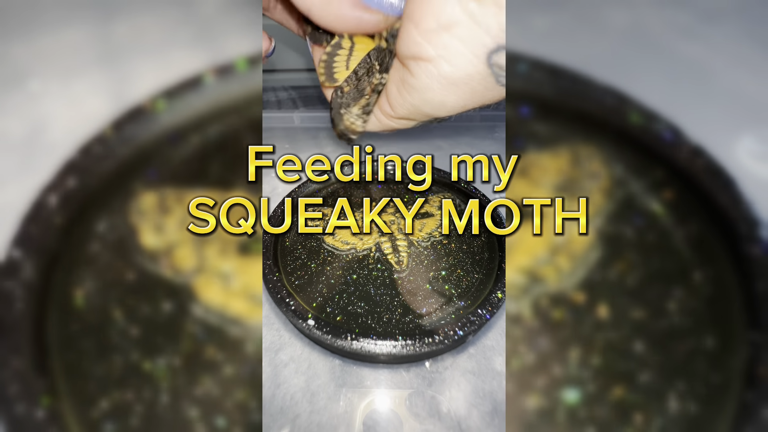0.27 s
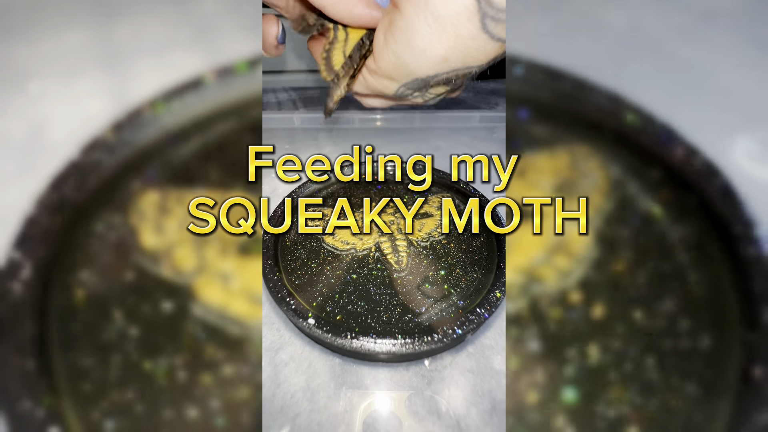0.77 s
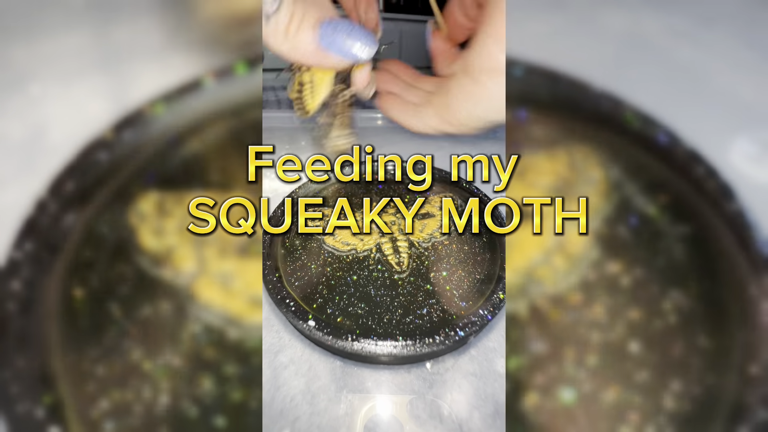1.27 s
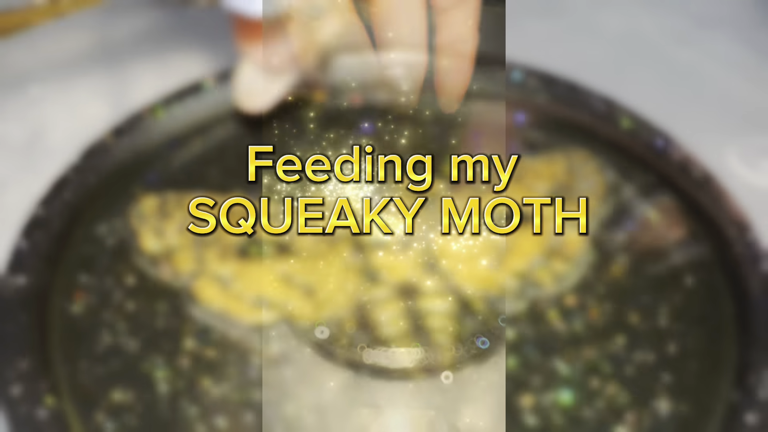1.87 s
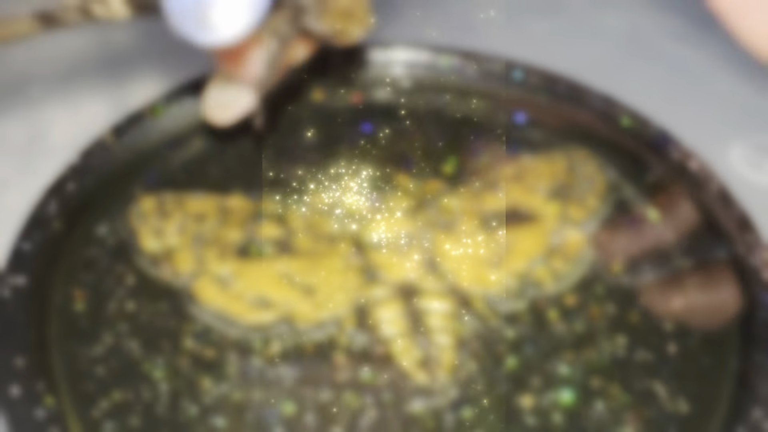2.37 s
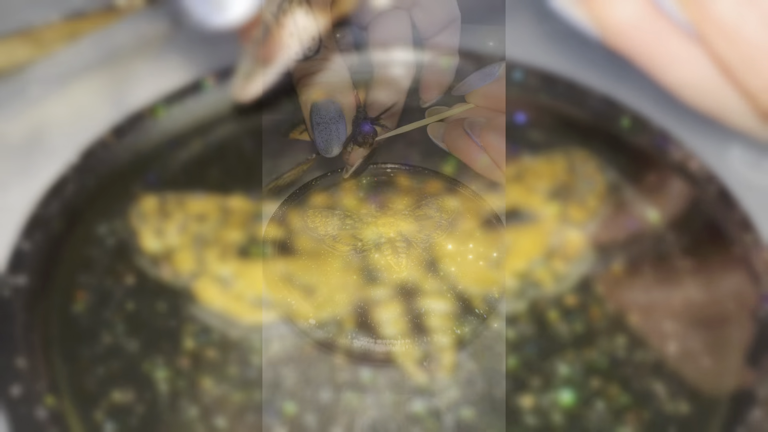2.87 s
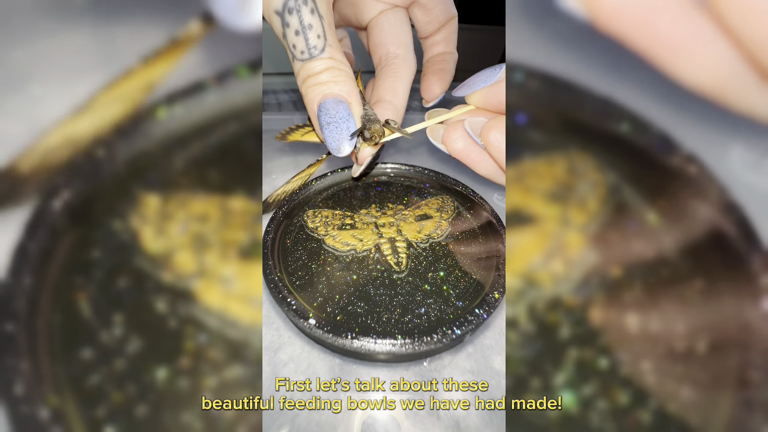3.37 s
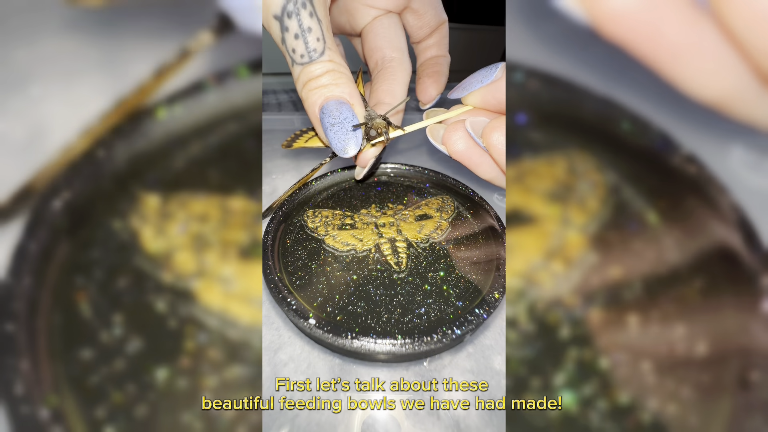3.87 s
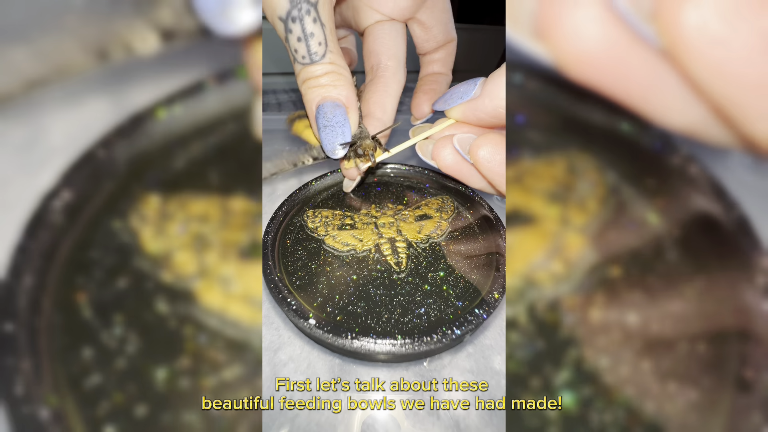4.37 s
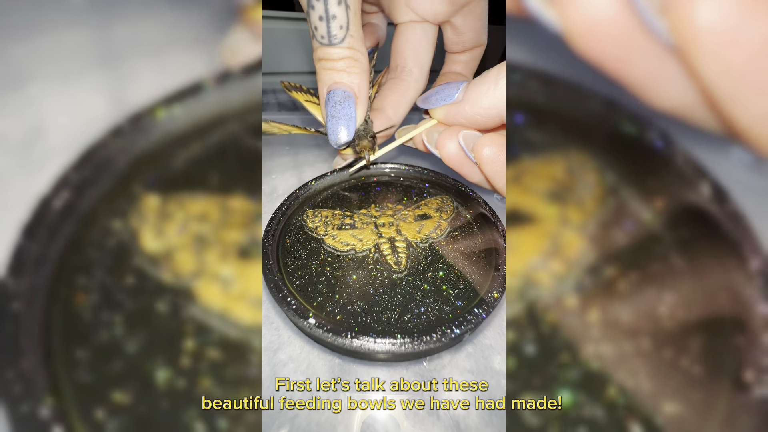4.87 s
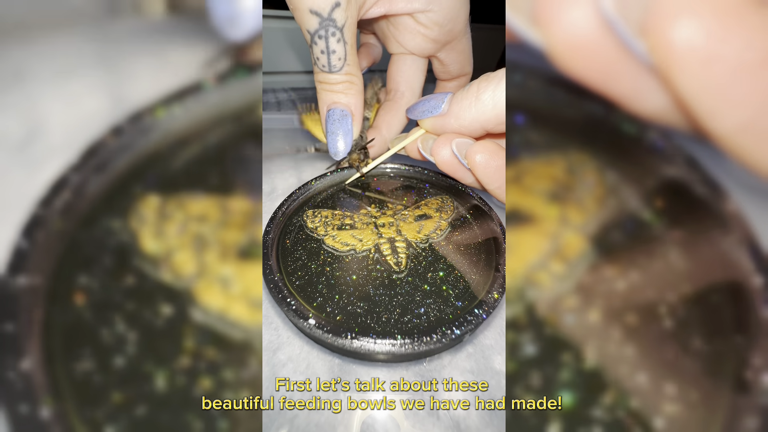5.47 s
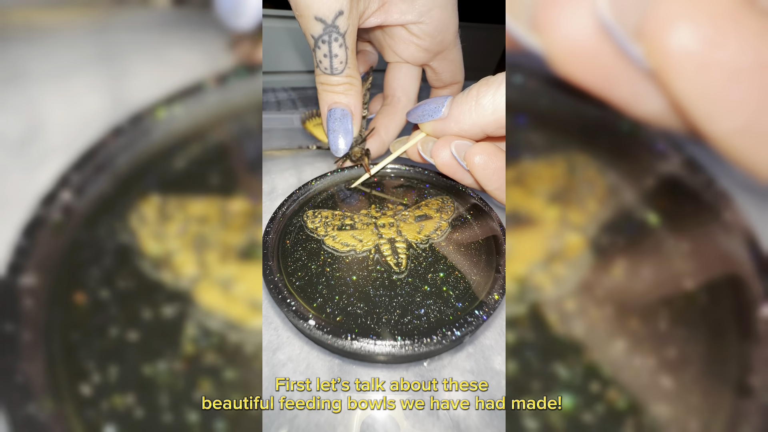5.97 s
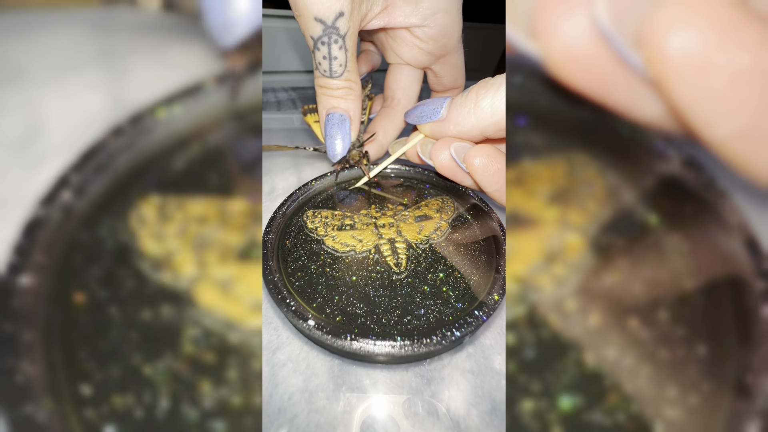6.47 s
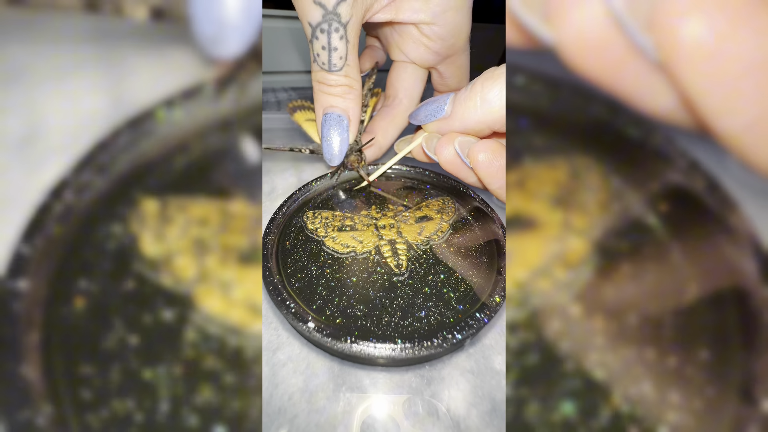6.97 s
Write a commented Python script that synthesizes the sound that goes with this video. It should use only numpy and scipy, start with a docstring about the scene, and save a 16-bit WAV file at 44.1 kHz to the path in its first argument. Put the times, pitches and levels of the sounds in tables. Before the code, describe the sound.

A large moth squeaks close to a phone microphone in a small quiet room. Short, buzzy, high chirps come regularly at first, grow louder and sharper after one second, then break into uneven clicks and short squeaks. Later the chirps turn slower, softer and more rattling. Tiny airy whistles follow some squeaks. Fingers and a stick softly bump the table over faint rumble, hum, rustle and hiss.

```python
"""A hawkmoth squeaks as it pumps air through its proboscis, held close to a phone in a small room.
Each intake flaps a lip in its throat into a train of sharp pulses, or into a few weak clicks.
Air blown back out gives a short, fluttering whistle.
Fingers and a feeding stick bump the table now and then, as a dull thud with a short tap of noise.
Underneath lie room rumble, a faint mains hum, rustling hands, hiss and one low, swelling drone."""
import sys
import numpy as np
from scipy import signal
from scipy.fft import rfft, irfft, next_fast_len
from scipy.io import wavfile
from scipy.ndimage import map_coordinates

SR = 44100
rng = np.random.default_rng(int(sys.argv[2]) if len(sys.argv) > 2 else 0)


def transcribe(u):
    """Save the signal u as a 16-bit wav file named by the first command-line argument.

    u: samples, shape (n,) or (channels, n), limited to [-1, 1]; the rate is SR.
    q: integer samples, one column per channel.
    """
    v = np.clip(np.atleast_2d(u).T, -1, 1)
    q = np.round(v * 32767).astype(np.int16)
    wavfile.write(sys.argv[1], SR, q)


N = 317961


def amp(db):
    """Amplitude ratio of a level in dB."""
    return 10 ** (np.asarray(db) / 20)


def unit(x):
    """Scale x to rms 1."""
    return x / np.sqrt(np.mean(x ** 2) + 1e-20)


def along(points, hz):
    """Read (f/Hz, value) points on a log frequency axis."""
    f, value = np.transpose(points)
    return np.interp(np.log(hz + 1), np.log(f + 1), value)


def curves(rows):
    """One value per sample for each column after the time."""
    s, *columns = np.transpose(rows)
    return [np.interp(np.arange(N) / SR, s, c) for c in columns]


def add(track, s, x):
    """Mix x into the track from time s."""
    i = max(0, round(s * SR))
    part = track[..., i:i + x.shape[-1]]
    part += x[..., :part.shape[-1]]


def wobble(rate, size):
    """A smooth random curve, rate knots a second."""
    knots = rng.standard_normal(int(size * rate / SR) + 4)
    return map_coordinates(knots, [np.arange(size) * rate / SR])


def filtered(x, response):
    """x times a complex response of frequency."""
    m = next_fast_len(x.shape[-1] + SR // 10)
    spectrum = rfft(x, m) * response(np.fft.rfftfreq(m, 1 / SR))
    return irfft(spectrum, m)[..., :x.shape[-1]]


def noise(colour, side_db, size):
    """Coloured stereo noise: a middle of about rms 1 and an independent side at side_db."""
    white = rng.standard_normal((2, size))
    mid, side = unit(filtered(white, lambda hz: amp(along(colour, hz))))
    return np.array([mid + amp(side_db) * side, mid - amp(side_db) * side])


# a low drone that sinks and swells from start to end; its start level is in dB
DRONE_START_S, DRONE_END_S = 2.62, 3.29
DRONE_HZ, DRONE_SAG_HZ_PER_S = 87.7, 22
DRONE_DB, DRONE_SWELL_DB_PER_S = -71, 30


def drone(overtone_db=-23, fade_s=0.012):
    """A faint, unsteady low tone with two overtones swells, sinks in pitch and stops."""
    out = np.zeros(N)
    t = np.arange(round((DRONE_END_S - DRONE_START_S) * SR)) / SR
    pitch = (DRONE_HZ - DRONE_SAG_HZ_PER_S * t) * (1 + 0.016 * wobble(18, len(t)))
    phase = 2 * np.pi * np.cumsum(pitch) / SR
    tone = unit(np.sin(phase) + amp(overtone_db) * (np.sin(2 * phase) + np.sin(3 * phase)))
    swell = amp(DRONE_DB + DRONE_SWELL_DB_PER_S * t)
    fade = np.clip(np.minimum(t, t[-1] - t) / fade_s, 0, 1)
    add(out, DRONE_START_S, tone * swell * fade)
    return out


# bed levels before their gains: (t/s, rumble level/dB, rustle level/dB)
BED_LEVELS = [(0.0, -68.5, -65.5), (0.68, -65.5, -78), (2.01, -64.5, -74), (2.45, -68, -75.5),
              (3.03, -62.5, -74), (3.78, -68, -82), (4.68, -64.5, -73), (5.48, -60.5, -77),
              (5.88, -70, -77.5), (6.36, -64.5, -79), (6.81, -62, -75.5), (7.21, -79, -87)]
# hiss before its random drift: (t/s, level/dB)
HISS_LEVELS = [(0, -67.5), (1.1, -67.5), (1.8, -79), (7.2, -77)]
# colour of the room rumble: (f/Hz, level/dB)
RUMBLE_COLOUR = [(13, -58), (22, -22.5), (43, 6.5), (86, 5.5), (200, -18), (260, -17.5), (440, -120)]
# colour of the rustling hands: (f/Hz, level/dB)
RUSTLE_COLOUR = [(90, -22), (150, 5), (300, -9.5), (600, -17.5), (1000, -18.5), (2000, -25), (4000, -34)]
# colour of the hiss: (f/Hz, level/dB)
HISS_COLOUR = [(600, -41), (1500, -8.5), (3000, -1), (4600, -7), (7600, 0), (12500, -34), (15300, -14.5),
               (17000, -28.5)]


def background(hum_hz=100, hum_max_db=-66, rumble_gain_db=2, rustle_gain_db=1):
    """Noise shaped into rumble, hand rustle and hiss, with a wavering sine for the mains hum."""
    t = np.arange(N) / SR
    rumble_db, rustle_db = curves(BED_LEVELS)
    fidget_db = 2 * wobble(13, N)  # rumble and rustle move together
    rumble = amp(rumble_db + rumble_gain_db + fidget_db) * noise(RUMBLE_COLOUR, -6.0, N)
    rustle = amp(rustle_db + rustle_gain_db + fidget_db) * noise(RUSTLE_COLOUR, 1, N)
    hiss = amp(curves(HISS_LEVELS)[0] + 1.3 * wobble(8, N)) * noise(HISS_COLOUR, -9.5, N)
    # hum_max_db caps the hum before its own drift
    hum_level = amp(np.minimum(hum_max_db, rumble_db - 1.5) + 3.8 * wobble(3.7, N))
    hum = hum_level * unit(np.sin(2 * np.pi * hum_hz * t + .5 * wobble(3.2, N)))
    balance = amp([[1], [-1]])  # left 1 dB up, right 1 dB down
    return (rumble + hum + drone()) * balance + rustle + hiss


# pulse colour while the moth is in the hand: (f/Hz, level/dB)
IN_HAND_COLOUR = [(250, -44), (600, -37.5), (1250, -25), (2100, -26), (3400, -19), (4600, -7.5), (5600, -9),
                  (6600, 4), (7700, 1.5), (8900, -8), (10300, -0.5), (12800, -30), (15200, -12),
                  (16600, -63)]
# pulse colour while it is pressed: (f/Hz, level/dB)
PRESSED_COLOUR = [(250, -40), (600, -44), (1250, -30), (2100, -35.5), (3400, -17), (4600, -9.5),
                  (5600, -17), (6600, -5), (7700, 4.5), (8900, -4), (10300, -9.5), (12800, -11.5),
                  (15200, -5), (16600, -40.5)]
# pulse colour while it is feeding: (f/Hz, level/dB)
FEEDING_COLOUR = [(250, -43.5), (600, -31), (1250, -18.5), (2100, -28), (3400, -13.5), (4600, -10),
                  (5600, -14), (6600, -6), (7700, 2.5), (8900, -7), (10300, -5.5), (12800, -16),
                  (15200, -11.5), (16600, -42)]
# courses of an intake, one entry per stage:
# ([flap rate over halfway rate], [strength level/dB], intake length for the full sweep/s)
ARCHED_COURSE = ([.86, .94, 1.03, 1, .78, 0.35], [-1, -1, -1.5, -2.5, -2, -7.5], .015)
FADING_COURSE = ([1, 1.08, 1.1, 0.92, 0.59, 0.35], [7, -0.5, -1.5, -1, 0.1, 0.5], 0.025)
GULPED_COURSE = ([1.25, 1.6, 1.17, 0.89, 0.83, 0.53], [-1.6, -2.6, 0.59, 0.95, 0.38, 0.16], 0.072)


def posture(s):
    """Colour, throat resonance at rest (Hz) and intake course for the way the moth is held at s."""
    held = [(1.22, IN_HAND_COLOUR, 7150, ARCHED_COURSE),  # until this time in s
            (4.05, PRESSED_COLOUR, 7760, FADING_COURSE),
            (8, FEEDING_COLOUR, 7760, GULPED_COURSE)]
    return next(rest for until, *rest in held if s < until)


def flaps(times, sizes, puff, ring=0.26, ring_s=0.00036, size=16):
    """Each flap is a snap and a tiny puff of air; the mouth cavity rings anew on each call."""
    at = times * SR + size // 2
    # windowless sinc snaps land between samples
    taps = at.astype(int)[:, None] + np.arange(1 - size // 2, size // 2 + 1)
    shapes = sizes[:, None] * np.sinc(taps - at[:, None])
    snaps = np.bincount(taps.ravel(), shapes.ravel(), taps.max() + SR // 200)
    starts = np.bincount(at.astype(int), sizes, len(snaps))
    t = np.arange(SR // 200) / SR
    decay = np.exp(-t / .0015)
    air = np.convolve(starts, decay / np.linalg.norm(decay))[:len(snaps)]
    cavity = rng.standard_normal(len(t)) * t * np.exp(-2 * t / ring_s)
    cavity = (t == 0) + ring * cavity / np.linalg.norm(cavity)
    return np.convolve(snaps + puff * air * rng.standard_normal(len(snaps)), cavity)


def ringing(colour_db, size=512):
    """The causal (minimum-phase) impulse response with a given colour, by folding its cepstrum."""
    cepstrum = irfft(colour_db(np.fft.rfftfreq(size, 1 / SR)) * np.log(10) / 20)
    cepstrum[1:size // 2] *= 2
    cepstrum[size // 2 + 1:] = 0
    return irfft(np.exp(rfft(cepstrum)))


# the throat tightens and relaxes:
# (t/s, resonance f/Hz, level near 4.5 kHz/dB, treble level/dB, extra level above 13 kHz/dB)
THROAT_TENSION = [(.3, 7170, 8, 7, 6), (.7, 6840, 1.5, 1.5, -3), (1.05, 6860, 0.5, 7, -5),
                  (1.26, 7430, -12, 3, -6), (1.6, 7340, 0.5, 1.5, -6), (2.05, 7790, 0, 5, -5.5),
                  (2.35, 7670, -3, -3, -3), (3.05, 8110, 0, -1.5, -6), (3.5, 8000, -1, 1.5, -3),
                  (3.9, 7980, -0.5, -0.5, 5), (4.6, 8200, 2, 3.5, 10.5), (5.099, 7520, 0.5, 4, 5),
                  (5.85, 7630, -1.5, 12, -4), (6.251, 7700, -1, 7, -6.5), (6.85, 7670, -3, 1, 8)]


def throat(x, s):
    """Pulses ring in the throat; posture sets the colour and tension shifts it a little."""
    colour, rest_hz, _ = posture(s)
    times, *columns = np.transpose(THROAT_TENSION)
    peak_hz, low_db, treble_db, sheen_db = [np.interp(s, times, c) for c in columns]
    tilt_hz = [2460, 4500, 5960, 8200, 9860, 12200, 13900]
    tilt_db = [0, low_db, 0, 0, treble_db, treble_db, treble_db + sheen_db]

    def colour_db(hz):
        # the shift fades out between 10 and 14 kHz
        moved = hz / (peak_hz / rest_hz) ** np.interp(hz, [10000, 14000], [1, 0])
        notch = np.interp(hz, [1600, 2150, 2900], [0, 2.5, 0])
        return along(colour, moved) + np.interp(hz, tilt_hz, tilt_db) - notch

    return np.convolve(x, ringing(colour_db))


# weak intakes of one to three flaps, level before the gain: (t/s, flaps, level/dB)
WEAK_INTAKES = [(.0446, 1, -47), (0.4683, 3, -37), (0.6699, 1, -39.5), (1.483, 2, -43), (1.7154, 1, -37),
                (2.1767, 1, -49), (2.264, 1, -28.5), (2.279, 2, -27.5), (2.977, 1, -41.5),
                (3.1327, 3, -34.5), (3.782, 2, -42), (4.0176, 1, -36.5), (4.1947, 1, -41.5),
                (4.2834, 1, -38), (4.4913, 1, -36.5), (4.7135, 1, -38.5), (4.82, 1, -47.5),
                (4.9126, 3, -46.5), (5.143, 1, -41), (5.1614, 1, -41), (5.51, 1, -43), (5.54, 1, -53),
                (5.9288, 1, -40), (6.095, 2, -35.5), (6.1268, 1, -39.5), (6.3036, 1, -35.5),
                (6.4663, 1, -41), (6.5857, 1, -41.5), (6.608, 1, -41), (6.6537, 1, -38), (6.7528, 2, -38.5)]


def clicks(gain_db=20, gap_s=0.0047):
    """Weak suction lets the lip flap only once or a few times, evenly spaced and equally loud."""
    out = np.zeros(N)
    for s, count, db in WEAK_INTAKES:
        for k in range(round(count)):
            click = throat(flaps(np.zeros(1), np.ones(1), puff=0.62), s)
            add(out, s + k * gap_s - .0003, amp(db + gain_db) * click / np.linalg.norm(click))
    return out


# full intakes: (start t/s, end t/s, halfway flap rate f/Hz before the course bends it, level/dB)
INTAKES = [(0.122, 0.145, 550, -35), (.21, .282, 640, -34.5), (0.373, 0.458, 730, -34.5),
           (0.571, 0.657, 740, -35.5), (0.725, .822, 705, -37.5), (0.905, 0.978, 720, -39.5),
           (1.046, 1.146, 620, -39), (1.24, 1.261, 570, -34.5), (1.266, 1.35, 620, -32),
           (1.519, 1.531, 400, -41.5), (1.546, 1.556, 360, -37), (1.561, 1.643, 624, -29),
           (1.923, 1.954, 368, -29.5), (1.9572, 1.975, 260, -28), (2.074, 2.107, 700, -28.5),
           (2.1956, 2.211, 490, -27.5), (2.251, 2.258, 430, -26.5), (2.302, 2.31, 390, -26.5),
           (2.3457, 2.405, 396, -27), (2.803, 2.834, 510, -29.5), (2.8688, 2.923, 530, -27.5),
           (3.0466, 3.06, 444, -37.5), (3.1755, 3.192, 486, -28.5), (3.4104, 3.426, 460, -31.5),
           (3.4337, 3.452, 550, -29.5), (3.4883, 3.508, 460, -26), (3.5334, 3.572, 457, -28),
           (3.703, 3.712, 640, -43), (3.7314, 3.742, 660, -38.5), (3.8317, 3.847, 730, -34),
           (3.889, 3.906, 630, -32), (3.946, 3.993, 650, -32.5), (4.129, 4.178, 515, -40),
           (4.207, 4.22, 270, -40.5), (4.2293, 4.276, 290, -39), (4.3809, 4.473, 307, -39),
           (4.5957, 4.618, 460, -38.5), (4.6252, 4.706, 320, -38.5), (4.9293, 4.987, 317, -41.5),
           (5.0364, 5.077, 312, -39.5), (5.107, 5.137, 234, -40), (5.278, 5.349, 376, -36.5),
           (5.6342, 5.656, 530, -37.5), (5.831, 5.912, 330, -34), (5.9958, 6.087, 354, -35.5),
           (6.1925, 6.274, 336, -36), (6.409, 6.416, 350, -52), (6.431, 6.441, 400, -48.5),
           (6.469, 6.493, 410, -37), (6.6136, 6.648, 287, -37), (6.8441, 6.901, 262, -37.5),
           (7.053, 7.062, 580, -45)]
# shares of an intake's length at which its course is given
COURSE_STAGES = [0, .1, .3, .5, .8, 1]


def squeaks(scatter_db=.6, puff=0.4, rise_s=.0025, slack=0.75):
    """The lip flaps fast and evenly under full suction and slows to uneven clicks as the intake ends."""
    out = np.zeros(N)
    for start, end, flap_hz, db in INTAKES:
        ratios, strength_db, full_s = posture(start)[2]
        t = np.arange(max(round((end - start) * SR), SR // 200)) / SR
        # short intakes sweep less
        sweep = np.interp(t / t[-1], COURSE_STAGES, ratios) ** min(1, t[-1] / full_s)
        rate = flap_hz * sweep
        cycles = np.cumsum(rate) / SR
        beats = np.arange(int(cycles[-1] + .26) + 1)
        # slow flaps are less even
        jitter = .007 + .02 * (400 / np.interp(beats, cycles, rate)) ** 2
        slip = np.cumsum(np.minimum(jitter, .1) * rng.standard_normal(len(beats)))
        times = np.interp(beats + slip - slip[0], cycles, t)
        # a taut, fast lip is slow to get going
        onset_s = rise_s * (rate[0] / 530) ** 4
        pressure = 1 - slack * np.exp(-times / onset_s)
        strength = np.interp(times / t[-1], COURSE_STAGES, strength_db)
        sizes = pressure * amp(strength + scatter_db * rng.standard_normal(len(times)))
        train = throat(flaps(times, sizes, puff), start)
        add(out, start - .0003, amp(db) * train * np.sqrt(len(t) / np.sum(train ** 2)))
    return out


def arch(glide, bow, u):
    """Pitch ratio as u runs from 0 to 1: a glide with a bow on top, both in octaves."""
    return 2 ** (glide * (u - .5) - bow * (2 * u - 1) ** 2)


# outflows, level before the tube colours it:
# (start t/s, end t/s, halfway pitch f/Hz, glide/octaves, level/dB)
OUTFLOWS = [(0.29, 0.332, 4500, -0.28, -41), (.494, .54, 4560, -0.36, -41.5),
            (0.834, 0.88, 3750, -0.72, -47), (0.987, 1.018, 4870, -.2, -44),
            (1.163, 1.208, 7050, -.06, -41), (1.395, 1.434, 6430, -0.18, -33),
            (1.987, 2.002, 4330, 0.12, -35), (2.428, 2.437, 4640, 0.12, -33.5),
            (2.454, 2.466, 3945, -0.93, -40), (2.927, 2.946, 4280, 0.46, -36),
            (2.944, 2.958, 4680, .2, -30), (3.581, 3.6, 8200, 0.38, -34.5),
            (4.023, 4.06, 6500, -0.086, -46), (4.297, 4.316, 6680, 0.14, -48.5),
            (4.322, 4.334, 7100, -0.068, -46.5), (6.916, 6.926, 4410, -0.79, -40.5)]
# low whistles overblow, flutter and arch in pitch, high ones stay plainer:
# (pitch f/Hz, octave level/dB, arch/octaves, flutter depth/rad)
WHISTLE_REGISTERS = [(4670, 4, .33, .8), (6500, -2.5, 0.025, 0.42)]


def whistles(flutter_hz=1850, air_db=-5):
    """Outflowing air whistles in the proboscis; the fluttering lip adds rough sidebands."""
    out = np.zeros(N)
    register_hz, *traits = np.transpose(WHISTLE_REGISTERS)
    for start, end, pitch_hz, glide, db in OUTFLOWS:
        octave_db, bow, flutter = [np.interp(pitch_hz, register_hz, c) for c in traits]
        size = max(round((end - start) * SR), SR // 200)
        t = np.arange(size) / SR
        bend = arch(glide, bow, t / t[-1])
        pitch = pitch_hz * bend * (1 + .025 * flutter * wobble(1400, size))
        lip_hz = flutter_hz * bend * (1 + .15 * wobble(500, size))
        lip = np.sin(2 * np.pi * np.cumsum(lip_hz) / SR)
        phase = 2 * np.pi * np.cumsum(pitch) / SR + flutter * lip
        tone = unit(np.sin(phase) + amp(octave_db) * np.sin(2 * phase))
        air = amp(air_db) * noise(PRESSED_COLOUR, 0, size)[0] * flutter
        gate = np.clip(t / .00036, 0, 1) * np.clip((1 - t / t[-1]) / 0.35, 0, 1)
        add(out, start, amp(db) * unit((tone + air) * gate * amp(2.3 * wobble(400, size))))
    # colour of the tube: (f/Hz, level/dB)
    tube = [(1500, -25.5), (2800, -11.0), (4400, 2.5), (5400, -4.5),
            (7300, 2), (9300, 3), (10800, -8.5), (16000, -9.5)]
    return filtered(out, lambda hz: amp(along(tube, hz)))


# soft contacts of fingers and stick, before the gains: (t/s, thud level/dB, tap level/dB)
CONTACTS = [(.573, -50, -58.5), (.846, -62, -90), (0.964, -55.5, -61), (1.391, -58, -86), (1.545, -57, -66),
            (1.702, -56, -58.5), (1.79, -52.5, -95), (1.828, -59, -101), (2.024, -55, -55),
            (2.168, -53, -56.5), (2.633, -58.5, -69), (3.113, -60, -55.5), (3.27, -62, -65.5),
            (4.419, -57.5, -60), (4.505, -58, -60), (4.581, -45.5, -56.5), (5.14, -61, -62.5),
            (5.27, -60.5, -79), (5.49, -59, -86), (6.139, -59.5, -54), (6.586, -71, -65)]
# colour of the thud: (f/Hz, level/dB)
THUD_COLOUR = [(30, -20), (70, 10), (170, 5.5), (300, -6.5), (500, -18.5), (2000, -83)]
# colour of the tap: (f/Hz, level/dB)
TAP_COLOUR = [(150, 0), (400, 2.5), (1100, 7.5), (2000, -1), (8000, -1), (16000, -33)]


def bumps(thud_gain_db=6, tap_gain_db=5, thud_t60=0.15, tap_t60=0.072):
    """A soft contact gives a dull thud and a short tap, both decaying noise; t60 in s."""
    out = np.zeros((2, N))
    t = np.arange(SR // 4) / SR
    for s, thud_db, tap_db in CONTACTS:
        thud_level = amp(thud_db + thud_gain_db - 60 * t / thud_t60)
        thud = noise(THUD_COLOUR, -2.4, len(t)) * thud_level * (1 - np.exp(-t / 0.00037))
        tap = noise(TAP_COLOUR, -7.5, len(t)) * amp(tap_db + tap_gain_db - 60 * t / tap_t60)
        add(out, s, thud + tap)
    return out


# level of the stereo blur by frequency: (f/Hz, level/dB)
BLUR_COLOUR = [(1500, -21), (4500, -16.5), (6300, -5), (8000, -8.5), (10000, -9.5), (12000, -16),
               (15500, -1)]


def stereo_blur(x, decay_s=0.0008, size=2048):
    """Short random reflections, unrelated left and right and redrawn every size samples, blur the treble."""
    out = np.zeros((2, N))
    decay = np.exp(-np.arange(SR // 250) / SR / decay_s)
    pieces = np.pad(x, (0, -N % size)).reshape(-1, 1, size)
    paths = rng.standard_normal((len(pieces), 2, len(decay))) * decay / np.linalg.norm(decay)
    for k, piece in enumerate(signal.fftconvolve(pieces, paths, axes=2)):
        add(out, k * size / SR, piece)
    return filtered(out, lambda hz: amp(along(BLUR_COLOUR, hz)))


# decay time of the room: (f/Hz, t60/s)
ROOM_DECAY = [(200, 0.9), (3000, 0.33), (8000, 0.11), (16000, 0.08)]


def room(x, tail_db=-19):
    """The walls answer with a short faint tail: stereo noise whose treble dies sooner."""
    hz, t, z = signal.stft(rng.standard_normal((2, SR // 3)), SR, nperseg=256)
    decay = amp(-60 * t / along(ROOM_DECAY, hz)[:, None])
    tail = signal.istft(z * decay, SR, nperseg=256)[1]
    tail = amp(tail_db) * tail / np.linalg.norm(tail[0])
    return signal.oaconvolve(x[None], tail, axes=1)[:, :N]


# phase between left and right, shared half each way: (f/Hz, phase/rad)
STEREO_PHASE = [(5700, 0), (6500, -1.2), (7800, -1.7), (9200, -1.6), (10500, -2.8), (13000, -3),
                (15000, -3.9)]


def scene():
    """The phone's stereo processing turns the moth's treble out of phase between left and right."""
    moth = clicks() + squeaks() + whistles()

    def stereo(hz):
        skew = np.exp(.5j * along(STEREO_PHASE, hz) * np.array([[1], [-1]]))
        # make room for the power of the blur
        return skew / np.hypot(1, amp(along(BLUR_COLOUR, hz)))

    return background() + filtered(moth + stereo_blur(moth) + room(moth), stereo) + bumps()


def record(dry, top_hz=16900):
    """The phone keeps nothing above its band limit; the last 500 Hz below it slope down."""
    return filtered(dry, lambda hz: np.clip((top_hz - hz) / 500, 0, 1))


dry = scene()
out = record(dry)
transcribe(out)
```